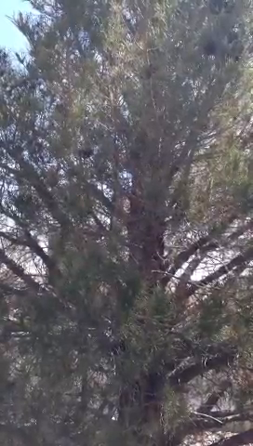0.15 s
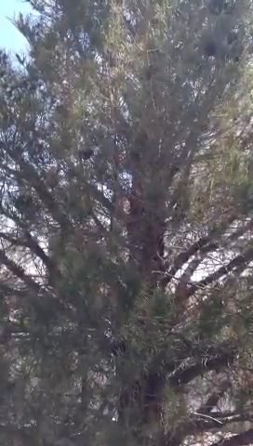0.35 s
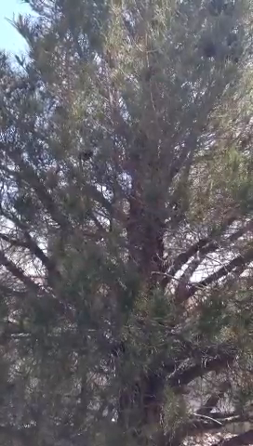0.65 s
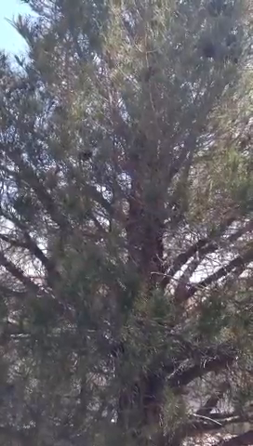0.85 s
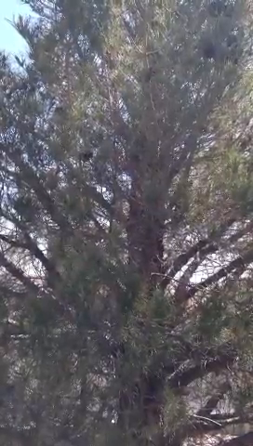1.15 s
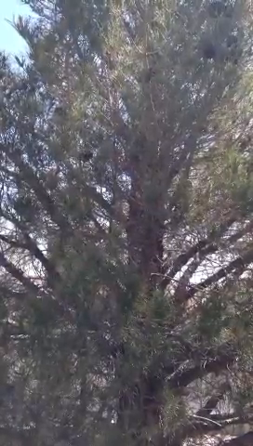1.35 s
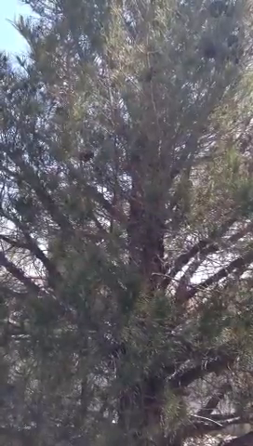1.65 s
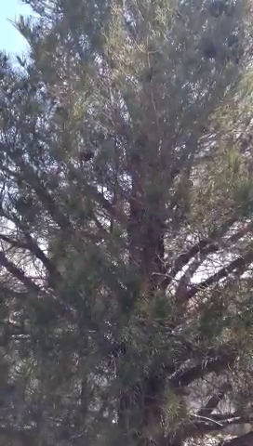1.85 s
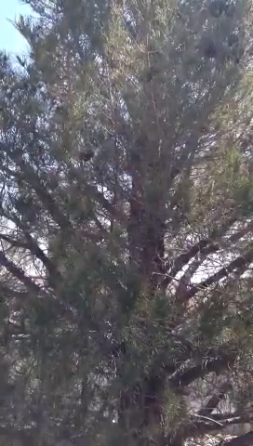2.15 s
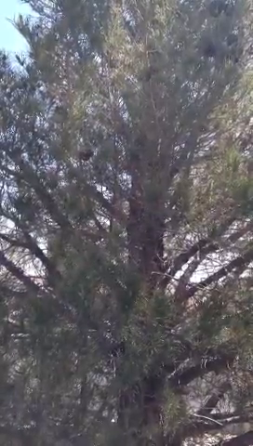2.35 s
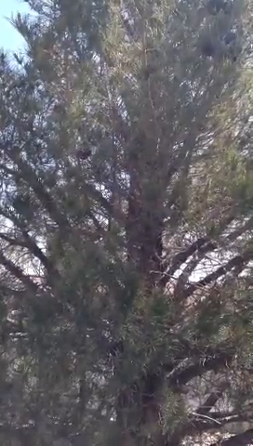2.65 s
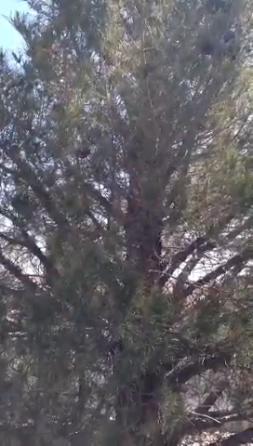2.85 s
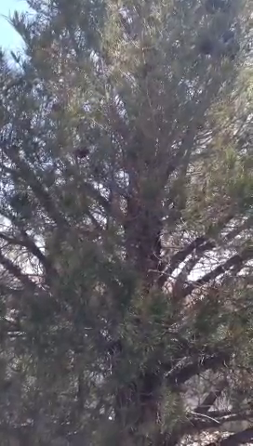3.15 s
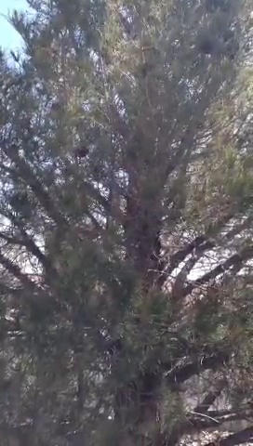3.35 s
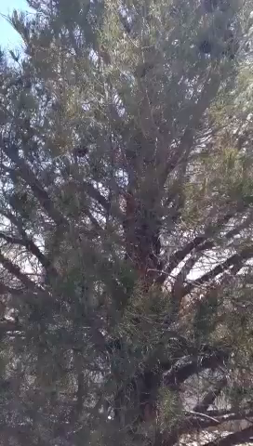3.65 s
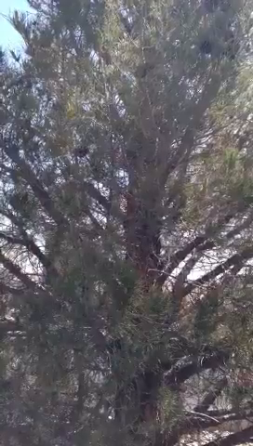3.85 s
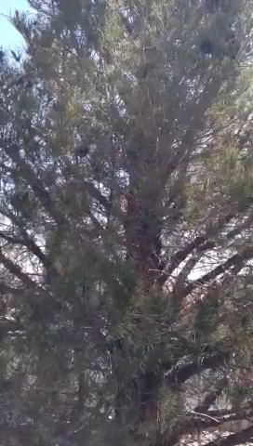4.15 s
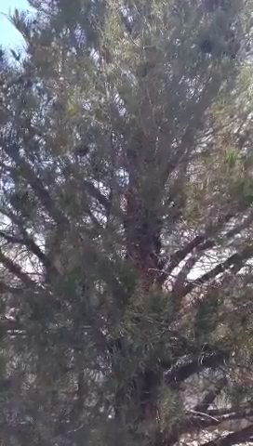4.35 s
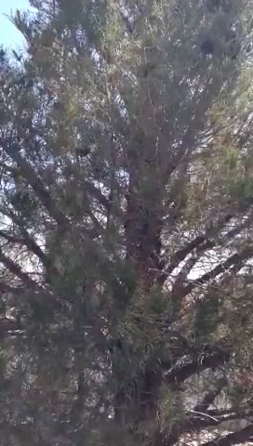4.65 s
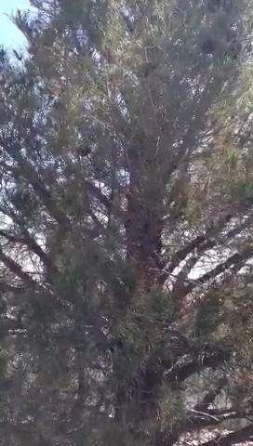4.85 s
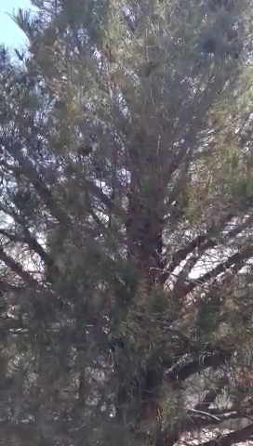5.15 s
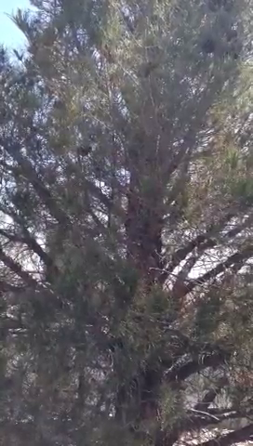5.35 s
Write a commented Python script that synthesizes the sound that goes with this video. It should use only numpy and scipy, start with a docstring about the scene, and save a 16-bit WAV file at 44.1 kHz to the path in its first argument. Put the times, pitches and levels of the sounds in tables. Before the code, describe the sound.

Outdoor bird call: harsh rasp into fluttering rising whistle, quiet nasal notes, dry hissy sputter, low creak and a clear descending whistle over faint air.

```python
"""A grackle-like bird calls from a pine: a rasp breaks into a rising whistle that snaps down,
then come soft nasal notes, faint thin tones, a dry sputtering hiss, a creak and a loud falling whistle.
Whistles are a few throat-shaped overtones, reedy notes a rough harmonic stack, hisses coloured noise.
Trunks and foliage scatter the calls over a faint, steady outdoor background of filtered noise."""
import sys
import numpy as np
from scipy import signal
from scipy.fft import rfft, irfft
from scipy.io import wavfile

SR = 44100
rng = np.random.default_rng(int(sys.argv[2]) if len(sys.argv) > 2 else 0)


def persist_wave(psi):
    """Save psi, clipped to +-1, as 16-bit WAV."""
    counts = np.round(np.clip(psi, -1, 1) * 32767).astype(np.int16)
    wavfile.write(sys.argv[1], SR, np.atleast_2d(counts).T)


N = 242991


def undb(db):
    """Decibels to gain."""
    return 10 ** (np.asarray(db) / 20)


def unit(x):
    """Scale to rms 1."""
    return x / np.sqrt(np.mean(x ** 2) + 1e-20)


def noise(n):
    """White noise."""
    return rng.standard_normal(n)


def gain_at(hz, spectrum):
    """Gain of a (Hz, dB) spectrum at any frequency, drawn straight over log frequency."""
    f, db = np.transpose(spectrum)
    return undb(np.interp(np.log(np.maximum(hz, 1)), np.log(f), db))


def colour(x, spectrum, tilt_db=0):
    """Filter by a spectrum that falls away below its first point, with a tilt in dB per octave; rms 1."""
    hz = np.fft.rfftfreq(len(x), 1 / SR) + 1
    low_cut = np.minimum(hz / spectrum[0][0], 1) ** 2
    gain = gain_at(hz, spectrum) * low_cut * undb(tilt_db * np.log2(hz))
    return unit(irfft(rfft(x) * gain, len(x)))


def wander(n, hz):
    """Smooth random drift up to about hz; spread 1."""
    f = np.fft.rfftfreq(n, 1 / SR)
    return unit(irfft(rfft(noise(n)) * np.exp(-.5 * (f / hz) ** 2), n))


def curves(table, before_s=0, after_s=0):
    """Sample times of a table's span, held a little before and after, and its columns along them."""
    s, *columns = np.transpose(table)
    first = int(max(s[0] - before_s, 0) * SR)
    t = np.arange(first, int((s[-1] + after_s) * SR)) / SR
    return t, *(np.interp(t, s, c) for c in columns)


def gate(n, attack_s, release_s):
    """Rounded rise and fall of a note."""
    t = np.arange(n) / SR
    ramp = np.minimum(t / attack_s, (t[-1] - t) / release_s)
    return np.sin(np.pi / 2 * np.clip(ramp, 0, 1)) ** 2


def add(out, start, x):
    """Mix a sound in at its time."""
    i = max(int(start * SR), 0)
    out[i:i + len(x)] += x[:N - i]


def whistle(hz, throat, harmonics, depth, tilt_db, jitter, grit, flutter_hz=205, bend=0.013,
            shimmer_db=2.3, flutter_grit=3, air=.22):
    """A nearly pure tone, overtones swelling at throat resonances; membrane flutter adds sidebands."""
    n = len(hz)
    beat = np.sin(2 * np.pi * np.cumsum(flutter_hz * (1 + 0.014 * wander(n, 62))) / SR)
    shaken_hz = hz * (1 + jitter * wander(n, 250) + bend * depth * beat)
    phase = 2 * np.pi * np.cumsum(shaken_hz) / SR
    tone, power = 0, 0
    for k, db in enumerate(harmonics, 1):
        # higher overtones are grittier, the more so while the membrane flutters
        fuzz = grit * k * (1 + flutter_grit * depth) * (wander(n, 328.3) + 1j * wander(n, 348))
        gain = gain_at(k * hz, throat) * undb(db + tilt_db * np.log2(k)) * (k * hz < SR / 2)
        overtone = np.imag((1 + fuzz) * np.exp(1j * k * phase))
        tone = tone + gain * undb(shimmer_db * wander(n, 104)) * overtone
        power = power + gain ** 2
    # air leaks past the fluttering membrane
    leak = air * depth * colour(noise(n), throat, tilt_db=-3)
    return (tone * np.sqrt(2 / power) + leak) * (1 + depth * beat)


def syrinx(hz, throat, rough, tilt_db=0, jitter=0.067, jitter_hz=450, air=0.31):
    """A reedy harmonic stack through the throat; roughness shakes the pitch and puffs air each cycle."""
    n = len(hz)
    phase = 2 * np.pi * np.cumsum(hz * (1 + jitter * rough * wander(n, jitter_hz))) / SR
    tone = 0
    for k in range(1, 18):
        gain = gain_at(k * hz, throat) * undb(tilt_db * np.log2(k)) * (k * hz < SR / 2)
        tone = tone + gain * np.sin(k * phase + rng.uniform(0, 2 * np.pi))
    puffs = colour(noise(n) * (1 + np.cos(phase)), throat, tilt_db)
    return unit(unit(tone) + air * rough * puffs)


def rising_whistle(scoop_s=.009, scoop_hz=110, dive_s=.043, dive_hz=3100, push_db=4.0, fade_db=-24,
                   pure_from_hz=3050, pure_db_per_octave=-14, strain_db=5):
    """A fluttering whistle climbs and grows purer; after a last push it dives ever faster and dies."""
    # Course of the whistle. Each row: time in seconds, pitch in Hz, level in dB.
    course = [(0.088, 2846, -28.5), (0.13, 2937, -32), (0.138, 2875, -31), (0.176, 2893, -35),
              (0.188, 2952, -31), (0.23, 2977, -27.5), (0.276, 3229, -25), (0.3, 3606, -27),
              (0.316, 3617, -34), (0.332, 3880, -22.5), (0.352, 3771, -25)]
    # Membrane flutter, strongest near the start, pausing briefly, then lighter to the end.
    # Each row: time in seconds, depth from 0 to 1.
    flutter = [(.09, 0.05), (.135, 0.52), (.2, 0.35), (.24, 0), (0.262, 0.21)]
    # Throat and beak resonances. Each row: frequency in Hz, gain in dB.
    throat = [(800, -15), (1700, -13), (2600, -8.5), (3900, -3), (4900, -16), (5900, -5), (7100, 1),
              (7800, -6), (8500, -1), (9050, 12.5), (9700, -7), (10800, 1), (11800, 5), (12800, -5.5),
              (14500, -7.5), (15300, -17)]
    # Strength of each harmonic at the membrane, from the fundamental up, in dB.
    harmonics = [4.5, -6, -12.5, -21.5, -18.5, -31]
    t, hz, db = curves(course, scoop_s, dive_s)
    scoop = np.maximum(course[0][0] - t, 0) / scoop_s
    dive = np.clip((t - course[-1][0]) / dive_s, 0, 1)
    hz = np.maximum(hz - scoop_hz * scoop ** 2 - dive_hz * dive ** 2, 500)
    db = db + np.interp(dive, [0, .17, .42, .64, 1], [0, -4, push_db, -2.5, fade_db])
    # high pitch thins the overtones, the strain of the dive brings them up
    purity = pure_db_per_octave * np.maximum(np.log2(hz / pure_from_hz), 0)
    tilt_db = purity + strain_db * dive * (1 - dive)
    depth = np.interp(t, *np.transpose(flutter))
    tone = whistle(hz, throat, harmonics, depth, tilt_db, jitter=.0035, grit=0.053)
    return t[0], tone * undb(db) * gate(len(t), 0.0036, .0011)


def snap(start=.366, rise_s=0.02, decay_s=0.016, db=-30):
    """The rising whistle collapses into a short crack of noise."""
    t = np.arange(int(.09 * SR)) / SR
    shape = np.minimum(t / rise_s, 1) * np.exp(-np.maximum(t - rise_s, 0) / decay_s)
    # Each row: frequency in Hz, gain in dB.
    spectrum = [(600, -19), (1300, 0.5), (3200, 16.5), (5000, 4.5), (7000, 12), (10000, -1.5), (15000, -8)]
    return start, colour(noise(len(t)), spectrum) * shape * undb(db)


def falling_whistle(scoop_s=.013, scoop_hz=1300, scoop_db=-19, droop_s=.02, droop_hz=190, droop_db=-17,
                    first_tilt_db=-14, open_s=0.011):
    """The whistle scoops up to its top, gains overtones, slides down most of an octave and droops away."""
    # Course of the whistle. Each row: time in seconds, pitch in Hz, level in dB.
    course = [(4.916, 3987, -28), (4.922, 3980, -25.5), (4.944, 3595, -29), (4.982, 3497, -23),
              (4.992, 3310, -26.5), (5.042, 3200, -27.5), (5.054, 3067, -23), (5.086, 2932, -26.5),
              (5.102, 2756, -25), (5.118, 2504, -27.5), (5.144, 2328, -30), (5.166, 2307, -26.5),
              (5.194, 2293, -30)]
    # Throat and beak resonances. Each row: frequency in Hz, gain in dB.
    throat = [(2200, 5.5), (2900, 2.5), (3400, 2), (4000, 14), (4600, -3.5), (5200, -22), (5950, 0),
              (6450, 6), (7050, 17), (7900, 5.5), (9800, 7.5), (11000, 5.5), (12500, 12), (15000, 4)]
    # Strength of each harmonic at the membrane, from the fundamental up, in dB.
    harmonics = [-1.5, -8.5, -19.5, -39, -39, -42]
    t, hz, db = curves(course, scoop_s, droop_s)
    scoop = np.maximum(course[0][0] - t, 0) / scoop_s
    droop = np.maximum(t - course[-1][0], 0) / droop_s
    hz = hz - scoop_hz * scoop ** 2 - droop_hz * droop ** 2
    db = db + scoop_db * scoop + droop_db * droop
    tilt_db = first_tilt_db * np.exp(-(t - t[0]) / open_s)
    tone = whistle(hz, throat, harmonics, 0, tilt_db, jitter=0.0019, grit=0.015)
    return t[0], tone * undb(db) * gate(len(t), 0.00184, .0011)


def rasp(warble_hz=71, warble=0.063):
    """A rough, grainy low voice with a fast warble."""
    # Course of the opening rasp. Each row: time in seconds, pitch in Hz, level in dB.
    course = [(0, 1180, -34), (.03, 1168, -32.5), (.061, 1133, -31), (.069, 1236, -34.5), (.078, 1470, -31),
              (.094, 1586, -33)]
    # Throat and beak resonances. Each row: frequency in Hz, gain in dB.
    throat = [(600, -40.5), (1170, -8.5), (1750, -23), (2350, -6), (3500, 0), (4500, 0), (5400, -19.5),
              (6900, -3), (7900, -16.5), (9000, -14), (11500, -22.5), (15000, -37)]
    t, hz, db = curves(course)
    hz = hz * (1 + warble * np.cos(2 * np.pi * warble_hz * t + .5))
    grain = undb(2.2 * wander(len(t), 300))
    voice = syrinx(hz, throat, rough=.6, jitter=.031, air=.75) * grain
    return t[0], voice * undb(db) * gate(len(t), 0.00031, 0.0062)


def creak(tilt_db=3, rough=.13, first_rough=1.25, clear_s=0.045, break_rough=0.71, break_s=0.0094):
    """Noise settles into a low nasal tone that swells and breaks off with a scrape."""
    # Course of the creak. Each row: time in seconds, pitch in Hz, level in dB.
    course = [(4.234, 874, -53), (4.27, 870, -47.5), (4.3, 874, -49.5), (4.328, 868, -53.5),
              (4.355, 837, -44.5), (4.378, 823, -45.5), (4.393, 828, -43), (4.405, 850, -63.5)]
    # Throat resonances. Each row: frequency in Hz, gain in dB.
    throat = [(850, -1.5), (2500, -7.5), (3400, -3), (4200, 0.5), (5100, -11.5), (6400, -10), (7500, -16.5),
              (8400, -6), (9600, -43), (10800, -21), (14000, -56)]
    t, hz, db = curves(course)
    clearing = first_rough * np.exp(-((t - t[0]) / clear_s) ** 2)
    scrape = break_rough * np.exp((t - t[-1]) / break_s)
    voice = syrinx(hz, throat, rough + clearing + scrape, tilt_db)
    return t[0], voice * undb(db) * gate(len(t), 0.006, 0.0034)


def nasal_notes(arch=0.024, rough=.13, catch=0.55, catch_s=0.015):
    """Quiet nasal notes on arched pitches, each sagging by the arch's share at both ends."""
    # Each row: start in seconds, length in seconds, pitch in Hz, glide over the note in Hz, level in dB,
    # swell over the note in dB, tilt in dB per octave.
    notes = [(1.952, 0.042, 1013, -65, -53.5, -12, 4), (2.093, .042, 1123, -26, -51.5, -1, 1.5),
             (2.263, 0.1233, 1277, 77, -47.5, 1, 2.5), (2.504, 0.065, 1280, 51, -53.5, -13, -4),
             (2.661, 0.075, 1132, -172, -49, -16.5, 1)]
    # Throat with the beak nearly shut. Each row: frequency in Hz, gain in dB.
    throat = [(800, 2), (1280, 5.5), (1900, 3.5), (2550, 1.5), (3300, -4), (4200, -9), (5000, -8),
              (5700, -12), (6400, -5), (7300, -28), (8400, -12), (9600, -36), (11200, -21.5), (15000, -47)]
    out = np.zeros(N)
    for start, length, pitch, glide, db, swell_db, tilt_db in notes:
        u = np.linspace(-1, 1, int(length * SR))
        hz = pitch * (1 - arch * u ** 2) + glide * u / 2
        # each note starts scratchy and clears as the membrane settles
        scratch = catch * np.exp(-np.arange(len(u)) / SR / catch_s)
        voice = syrinx(hz, throat, rough + scratch, tilt_db)
        add(out, start, voice * undb(db + swell_db * u / 2) * gate(len(u), 0.011, 0.017))
    return out


def thin_tones(waver_db=2.0):
    """Faint thin tones: whistles, chips, a far echo of the first call, a note's ringing tail."""
    # Each row: start in seconds, length in seconds, first pitch in Hz, last pitch in Hz, level in dB.
    tones = [(0.769, 0.13, 3540, 3550, -67.5), (2.378, 0.214, 2625, 2480, -66),
             (2.64, 0.03, 2910, 2580, -52), (2.798, 0.28, 1986, 2260, -66.5),
             (2.833, 0.074, 2720, 2980, -63), (3.253, .17, 2220, 2285, -71.5),
             (3.629, 0.11, 2320, 2310, -64), (3.688, .11, 2230, 2206, -66.5)]
    # Resonances that shape them. Each row: frequency in Hz, gain in dB.
    throat = [(2300, 0.5), (4600, 2.5), (7000, -5.5), (9200, -12), (11500, -29), (14000, -34)]
    # Overtone balance by mean pitch. Each row: pitch in Hz, tilt in dB per octave.
    purity = [(2050, -9), (2330, 3), (2530, -32)]
    out = np.zeros(N)
    for start, length, first, last, db in tones:
        hz = np.linspace(first, last, int(length * SR))
        tilt_db = np.interp(hz.mean(), *np.transpose(purity))
        voice = syrinx(hz, throat, 0.19, tilt_db)
        waver = waver_db * wander(len(hz), 48)
        add(out, start, voice * undb(db + waver) * gate(len(hz), 0.016, 0.014))
    return out


def hiss(n, tilt_db, grain_db=3, fade_s=.013):
    """A stretch of dry hiss: noise made grainy by fast level changes, then coloured."""
    # Colour of the sputter. Each row: frequency in Hz, gain in dB.
    spectrum = [(600, -25), (1200, -10), (2200, -8.5), (3300, -3), (4500, -1.5), (5300, -11), (6800, -3),
                (8500, -5), (9600, -15.5), (12500, -11.5), (15000, -22)]
    grains = noise(n) * undb(grain_db * wander(n, 670))
    return colour(grains, spectrum, tilt_db) * gate(n, 0.013, fade_s)


def sputter(puff_s=0.041, flicker_db=2, flicker_hz=22):
    """Short puffs over an uneven, flickering hiss that leads up to the falling whistle."""
    # Puffs of hiss. Each row: start in seconds, level in dB, tilt in dB per octave.
    puffs = [(3.87, -60.5, -5), (4.073, -58, 0), (4.446, -57.5, 3.5), (4.626, -51, -1), (4.689, -56.5, 2)]
    # Hiss that runs on between them. Each row: time in seconds, level in dB.
    course = [(3.9, -71), (4.2, -70.5), (4.54, -67), (4.585, -55.5), (4.66, -61), (4.755, -66),
              (4.81, -57.5), (4.845, -63), (4.875, -58), (4.905, -60)]
    out = np.zeros(N)
    for start, db, tilt_db in puffs:
        add(out, start, hiss(int(puff_s * SR), tilt_db) * undb(db))
    t, db = curves(course)
    flicker = flicker_db * wander(len(t), flicker_hz)
    add(out, t[0], hiss(len(t), tilt_db=2.0) * undb(db + flicker))
    return out


def trees(x, near_db=-20, near_s=0.014, far_db=-21, t60=.65, echo_s=.069, echo_db=-22):
    """Close branches blur the call, a hard face answers once, and the grove adds a dull tail."""
    # What the trees send back, laid over all the levels above. Each row: frequency in Hz, gain in dB.
    spectrum = [(1000, 7.5), (2000, -4), (2600, 5.5), (3700, 4.5), (4400, 5), (6000, 3), (7000, -3.5),
                (9000, -7.5), (15000, -24.5)]
    t = np.arange(int(.8 * SR)) / SR
    near = (t > .002) * np.exp(-t / near_s)
    far = (1 - np.exp(-t / 0.018)) * np.exp(-np.log(1000) * t / t60)
    response = undb(near_db) * unit(near * noise(len(t))) + undb(far_db) * unit(far * noise(len(t)))
    response /= np.sqrt(len(t))  # unit energy before each level
    response[int(echo_s * SR)] += undb(echo_db)
    response = irfft(rfft(response) * gain_at(np.fft.rfftfreq(len(t), 1 / SR), spectrum), len(t))
    return signal.fftconvolve(x, response * gate(len(t), 0.00079, .1))[:N]


def background(level_db=-51.5, sway_db=-0.4):
    """Low distant rumble and smooth hiss from coloured noise, swaying slightly."""
    # Distant outdoor air. Each row: frequency in Hz, density in dB per Hz (relative).
    spectrum = [(18, -79), (30, -49.5), (53, -33), (139, -2), (200, -3), (234, -2), (328, -9), (953, -12),
                (2030, -23), (2310, -25), (2840, -27.5), (4540, -30), (5300, -35.5), (10400, -44),
                (15000, -40.5)]
    return colour(noise(N), spectrum) * undb(level_db + sway_db * wander(N, 0.84))


def scene():
    """The bird, its reflections and the air."""
    bird = nasal_notes() + thin_tones() + sputter()
    for call in (rising_whistle, snap, falling_whistle, rasp, creak):
        add(bird, *call())
    return (bird + trees(bird) + background())[None]


def record(dry, top_hz=15300):
    """The recorder cuts the top steeply: an elliptic low-pass run both ways."""
    low_pass = signal.ellip(10, .1, 60, top_hz, fs=SR, output="sos")
    return signal.sosfiltfilt(low_pass, dry)


dry = scene()
out = record(dry)
persist_wave(out)
```